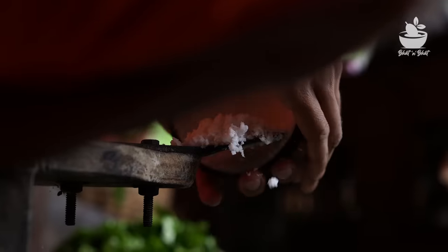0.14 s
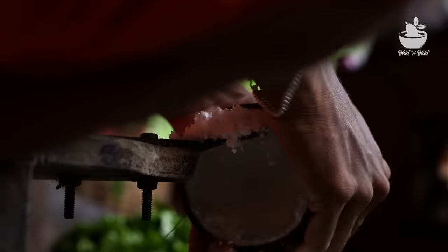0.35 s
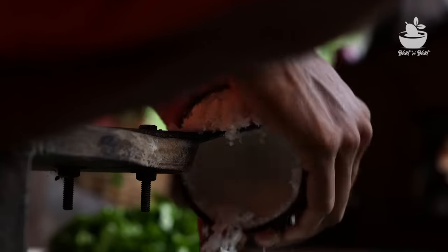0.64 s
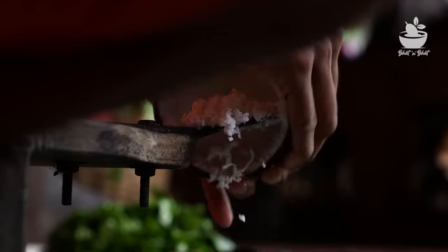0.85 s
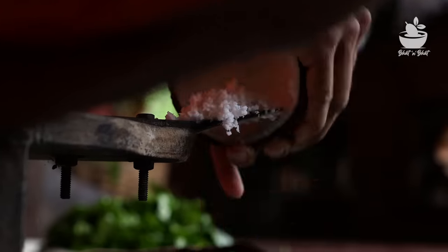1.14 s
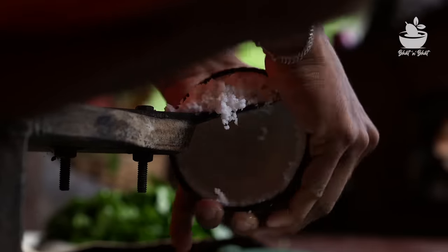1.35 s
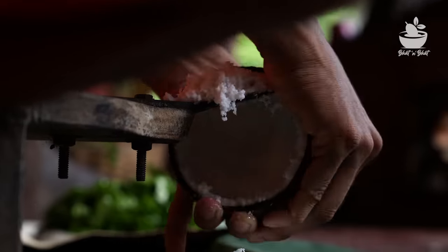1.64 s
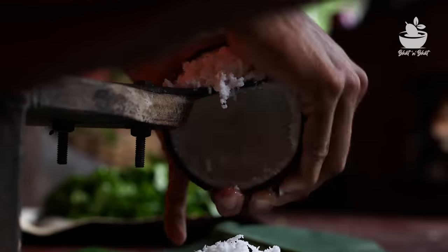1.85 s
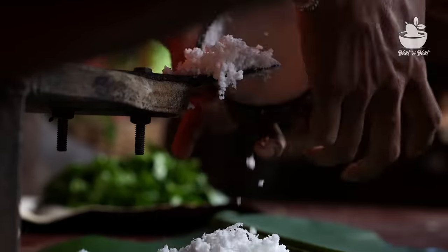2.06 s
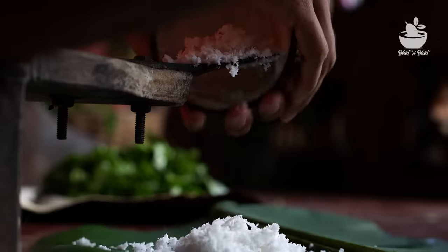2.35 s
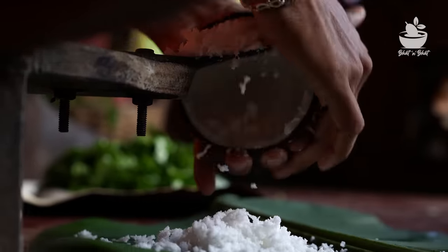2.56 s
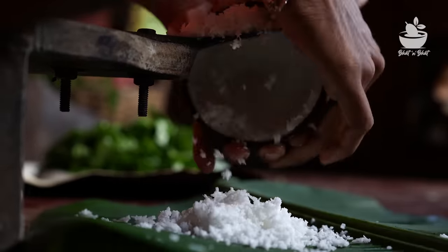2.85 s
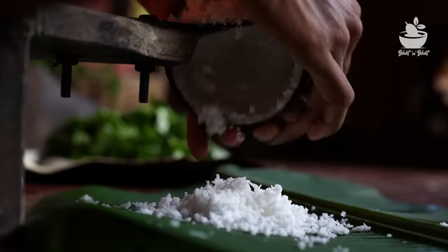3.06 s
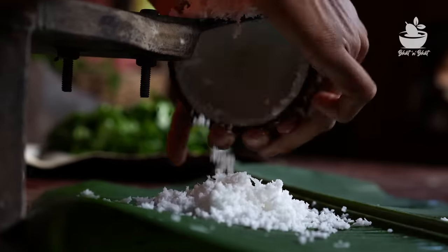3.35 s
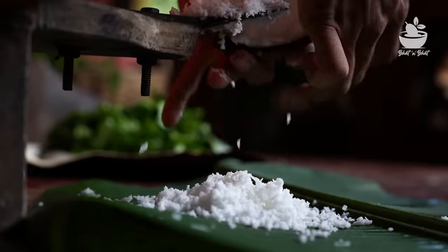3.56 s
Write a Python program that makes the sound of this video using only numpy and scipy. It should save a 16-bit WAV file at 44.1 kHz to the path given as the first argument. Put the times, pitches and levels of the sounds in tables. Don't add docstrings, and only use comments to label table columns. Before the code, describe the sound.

Hollow, gritty coconut grating in ten brief strokes, each quickly fading, with woody knocks and tiny steel pings between; a short pause past the middle, then a loudest knock near the end, close in a quiet room.

```python
import sys
import numpy as np
from scipy import signal
from scipy.fft import rfft, irfft, next_fast_len
from scipy.io import wavfile
from scipy.ndimage import uniform_filter1d, minimum_filter1d

SR = 44100
rng = np.random.default_rng(int(sys.argv[2]) if len(sys.argv) > 2 else 0)


def level_to_linear(level):
    exponent = np.asarray(level, float) / 20
    return 10 ** exponent


def dump_mix(stems):
    frames = np.atleast_2d(stems).T
    limited = np.clip(frames, -1, 1)
    pcm = np.round(limited * 32767).astype(np.int16)
    wavfile.write(sys.argv[1], SR, pcm)


N = 163170
T = np.arange(N) / SR

# centre in Hz, width in Hz, level in dB.
SHELL = [(245, 30.2, -11.5), (361.2, 31.2, 1), (432.3, 63.4, -3), (520, 93.4, -5), (634, 142, -14)]


def unit(x):
    return x / np.sqrt(np.mean(x ** 2) + 1e-20)


def ramp(u):
    return np.sin(np.pi / 2 * np.clip(u, 0, 1)) ** 2


def along(points, hz):
    f, value = np.transpose(points)
    return np.interp(np.log(hz + 1), np.log(f + 1), value)


def filtered(x, response):
    size = next_fast_len(N + SR // 2)
    spectrum = rfft(x, size) * response(np.fft.rfftfreq(size, 1 / SR))
    return irfft(spectrum, size)[..., :N]


def peak(f, centre, width):
    return 1j * f * width / (centre * centre - f * f + 1j * f * width)


def modes(table):
    return lambda f: sum((-1) ** k * level_to_linear(db) * peak(f, hz, width) for k, (hz, width, db) in enumerate(table))


def patchy(x, depth_db, tall, wide):
    z = signal.stft(x, nperseg=256)[2]
    field = uniform_filter1d(rng.standard_normal(z.shape), tall, 0)
    field = uniform_filter1d(field, wide, 1)
    return unit(signal.istft(z * level_to_linear(depth_db * unit(field)), nperseg=256)[1][:N])


def floor():
    # frequency in Hz, density in dB per Hz.
    floor_colour = [(12, -19), (20, -1), (74, -11.5), (107, -6), (145, -12), (344, -11.5), (888, -23.5),
                    (1080, -28.5), (15700, -51.5)]
    air = patchy(rng.standard_normal(N), depth_db=1.7, tall=3, wide=28)

    def colour(f):
        whine = level_to_linear(-14) * peak(f, 2280, 87)
        return level_to_linear(along(floor_colour, f)) * (1 + whine)

    return level_to_linear(-44) * unit(filtered(air, colour))


def kitchen(x):
    # frequency in Hz, t60 in seconds.
    room_decay = [(200, 0.98), (500, 0.43), (2000, 0.54), (10000, 0.089)]
    hz, t, z = signal.stft(rng.standard_normal(SR), SR, nperseg=256)
    decay = level_to_linear(-60 * t / along(room_decay, hz)[:, None])
    tail = signal.istft(z * decay, SR, nperseg=256)[1]
    delayed = np.pad(x, (300, 0))
    answer = level_to_linear(-19.5) * signal.fftconvolve(delayed, tail / np.linalg.norm(tail))[:N]
    earlier = unit(filtered(rng.standard_normal(N), modes(SHELL))) * level_to_linear(-41.5 - 60 * T / 0.5)
    return answer + earlier


def slide():
    # centre in Hz, width in Hz, level in dB.
    hum_modes = [(2370, 90, 4), (4400, 200, -7), (5200, 300, -12)]
    start_s, length_s, level_db = 2.12, 0.25, -66
    u = (T - start_s) / length_s
    rub = patchy(rng.standard_normal(N), depth_db=1, tall=2, wide=10)
    hum = filtered(rub, lambda f: modes(hum_modes)(f) * peak(f, 3000, 4000))
    return level_to_linear(level_db) * ramp(u / 0.12) * ramp((1 - u) / 0.69) * unit(hum)


def ticks():
    # start in seconds, peak in dB, pitch in Hz.
    pings = [(0.524, -40, 5200), (1.096, -51, 5500), (1.183, -46, 5200), (1.796, -41, 5300),
             (1.800, -41, 2140), (2.103, -46, 4970), (2.609, -44, 5960), (2.610, -49, 3200),
             (2.687, -38.5, 5200), (3.169, -44.5, 4950), (3.266, -34.5, 5240), (3.501, -42, 2520),
             (3.5455, -41.5, 4940), (3.546, -38, 2280), (3.598, -49, 1850), (3.641, -44, 2500)]
    spread_hz, fade_s, rise_s = 220, 0.0035, 0.00037
    out, t = np.zeros(N + SR), T[:1500]
    for s, db, hz in pings:
        pitches = hz + spread_hz * rng.standard_normal((3, 1))
        tone = np.sin(2 * np.pi * pitches * t).sum(0)
        click = 0.93 * rng.standard_normal(len(t)) * np.exp(-t / 0.0026)
        envelope = level_to_linear(db - 11) * ramp(t / rise_s) * np.exp(-t / fade_s)
        out[round(s * SR):][:len(t)] += envelope * (tone + click)
    return out[:N]


def steel(f):
    # frequency in Hz, density in dB per Hz.
    rasp_colour = [(410, -24.5), (760, -5.5), (1300, -9.5), (1850, -22.5), (2400, -21), (3700, -27),
                   (6500, -35.5), (10000, -43), (15700, -44.5)]
    # centre in Hz, width in Hz, height in dB.
    blade_modes = [(984, 51, 4.38), (1340, 62, 4.6), (1580, 24, 8.2), (1995, 45, 6.7), (2190, 117, 7.7),
                   (2412, 61, 9.8), (2970, 23, 8.9), (3310, 156, 4.8), (3930, 49, 7.5), (4396, 140, 5.4),
                   (5000, 160, 4.1), (5460, 190, 5.7), (9430, 1900, 5.6), (10100, 140, 3.7)]
    c = irfft(np.log(np.maximum(level_to_linear(along(rasp_colour, f)), 1e-3)))
    c[1:len(c) // 2] *= 2
    c[len(c) // 2 + 1:] = 0
    ringing = np.prod([1 + (level_to_linear(db) - 1) * peak(f, hz, width) for hz, width, db in blade_modes], axis=0)
    return np.exp(rfft(c)) * ringing


def taps():
    # start in seconds, peak in dB, brightness in dB.
    landings = [(0.123, -13.5, -3), (0.524, -13.5, 4.5), (0.862, -9, 2), (1.178, -9.5, 1), (1.503, -12, -6),
                (1.794, -9.5, -1), (1.823, -7, 0), (2.102, -7, 2.5), (2.689, -12, 5), (3.0, -16, -3),
                (3.265, -1, 0.5)]
    # frequency in Hz, level in dB, t60 in seconds.
    knock_modes = [(249.4, -0.5, 0.046), (359.6, 3.5, 0.042), (524, -10, .035), (640, -14.5, 0.027),
                   (985, -21, 0.034), (1343, -26, 0.033), (2220, -30.5, 0.035), (2410, -30.5, 0.03)]
    knock_db, scuff_db = -8.5, -27.5
    hits = ((0.00151, 0), (0.012, -13.5))
    low, high = np.zeros((2, N + SR))
    t = T[:4000]
    hz, level_db, t60 = np.transpose(knock_modes)[:, :, None]
    burst = ramp(t / 0.0031) * np.exp(-t / 0.0043)
    for s, db, bright_db in landings:
        for delay, hit_db in hits:
            i = round((s + delay) * SR)
            mode_db = level_db + 2 * rng.standard_normal(hz.shape) + bright_db * (hz > 800)
            ring = level_to_linear(mode_db - 60 * t / t60) * np.sin(2 * np.pi * hz * t)
            low[i:i + len(t)] -= level_to_linear(db + knock_db + hit_db) * ramp(t / 0.0014) * ring.sum(0)
            scuff = burst * rng.standard_normal(len(t))
            high[i:i + len(t)] += level_to_linear(db + scuff_db + bright_db + hit_db) * scuff
    steel_gain = np.std(filtered(rng.standard_normal(N), steel))
    return low[:N] + filtered(high[:N], steel) / steel_gain


def pulses(rate_hz, scatter, size_db):
    gaps, sizes = rng.standard_normal((40000, 2)).T
    at = (np.cumsum(np.exp(scatter * gaps)) / rate_hz * SR).astype(int)
    inside = at < N
    return unit(np.bincount(at[inside], level_to_linear(size_db * sizes[inside]), N))


def contact(s, length, bite, lift, rub_db):
    past_end = T - s - length
    rub = level_to_linear(rub_db) * ramp((T - s) / 0.031 + 1)
    hold = ramp(1 - (past_end + lift) / (2 * lift))
    drag = level_to_linear(-34) * np.exp(-np.maximum(past_end, 0) / 0.046)
    return (ramp((T - s) / bite) + rub) * (hold + drag)


def steadied(x, body):
    steady, steady_s = 0.55, 0.025
    power = unit(filtered(x, body)) ** 2
    load = np.abs(uniform_filter1d(power, int(steady_s * SR), origin=-150))
    return x / (load + 0.05) ** (steady / 2)


def strokes():
    # start in seconds, length in seconds, force in dB,
    # brightness in dB, force lost over the stroke in dB.
    pushes = [
        (0.227, 0.16, -12.5, -1.5, 7.5),
        (0.551, 0.16, -11.5, -2, 1),
        (0.881, 0.15, -12.5, -1, 9),
        (1.203, .15, -12.5, 0, 5.5),
        (1.524, 0.14, -12, 1, 12.5),
        (1.819, .13, -11.5, 0.5, 10),
        (2.383, 0.15, -13.5, 1.5, 10),
        (2.721, 0.13, -12, 1.5, 9.5),
        (3.02, 0.12, -11, -0.5, 11.5),
        (3.302, 0.12, -11, 2.5, 13),
    ]
    # time to dig in in seconds, arm thud in dB, rub before the bite in dB.
    grips = [(.015, 7, -27.5), (0.025, -6, -36), (0.023, 5.5, -25.5), (0.024, 3.5, -26), (0.026, 0, -28.5),
             (0.026, -9, -37.5), (0.021, 3.5, -18), (0.028, 0.5, -24.5), (0.024, 1.5, -27.5),
             (0.015, -5.5, -27.5)]
    # centre in Hz, width in Hz, level in dB.
    arm_modes = [(156.6, 113, -7), (180.6, 63, 0.5), (252, 103, -1)]
    tear_share, bunching = 0.41, 0.29
    rasp_sag = 0.39
    lift_s, rasp_lift_s, thud_s = 0.022, 0.043, 0.057
    thud_db, rasp_db, crackle_db = -11, -17.5, -20.5
    soft_hz = 1390

    catch = pulses(rate_hz=120, scatter=0.3, size_db=2)
    bunch = unit(np.convolve(catch, np.exp(-T[:900] / 0.0038))[:N])
    fibres = pulses(rate_hz=11887, scatter=0.9, size_db=4.5) * rng.choice([-1, 1], N)
    tear = unit(fibres * (1 - bunching + bunching * bunch))

    force, rasp, thud = np.zeros((3, N))
    for (s, length, db, bright_db, loss_db), (bite, grip_thud_db, rub_db) in zip(pushes, grips):
        u = np.clip((T - s) / length, 0, 1)
        gate = contact(s, length, bite, lift_s, rub_db)
        rasp_gate = contact(s, length, bite, rasp_lift_s, rub_db)
        force += level_to_linear(db - loss_db * u ** 1.59) * gate
        rasp += level_to_linear(db + bright_db - rasp_sag * loss_db * u ** 0.83) * rasp_gate
        thud += level_to_linear(db + grip_thud_db) * gate * np.exp(-u * length / thud_s)

    push = (1 - tear_share) * (catch - catch.mean()) + tear_share * tear
    push = patchy(push, depth_db=2.5, tall=1, wide=12)
    push = filtered(push, lambda f: 1 / (1 + 1j * f / soft_hz) ** 2)
    push = steadied(push, modes(SHELL))
    scrape = patchy(tear, depth_db=2.5, tall=4, wide=6) + level_to_linear(crackle_db) * unit(push)

    def driven(x, envelope, body):
        return filtered(x * envelope, body) / np.std(filtered(x, body))

    shell = driven(push, force, modes(SHELL))
    arm = level_to_linear(thud_db) * driven(push, thud, modes(arm_modes))
    blade = level_to_linear(rasp_db) * driven(scrape, rasp, steel)
    return shell + arm + blade


def scene():
    work = strokes() + taps() + ticks()
    mid = work + kitchen(work) + floor() + slide()
    return np.array([mid, mid])


def band_limit(x):
    return signal.sosfilt(signal.butter(12, 17040, fs=SR, output="sos"), x)


def record(dry):
    # frequency in Hz, density in dB per Hz.
    side_colour = [(20, -12), (107, -28), (364, 2.5), (620, -17), (1500, -67), (3500, -67), (8000, -48),
                   (15700, -46)]
    ceiling, hold_s, side_db, top_hz = 0.575, 0.0015, -40.5, 15800
    hold = int(hold_s * SR) + 2
    wanted = np.minimum(1, ceiling / (np.abs(dry[0]) + 1e-9))
    gain = uniform_filter1d(minimum_filter1d(wanted, 2 * hold), hold)
    level = np.sqrt(np.abs(uniform_filter1d(dry[0] ** 2, 900)))
    hiss = unit(filtered(rng.standard_normal(N), lambda f: level_to_linear(along(side_colour, f))))
    side = level_to_linear(side_db) * unit(level * hiss) * np.std(dry)
    mix = filtered(dry * gain + [side, -side], lambda f: f < top_hz)
    return band_limit(mix)


dry = scene()
out = record(dry)
dump_mix(out)
```